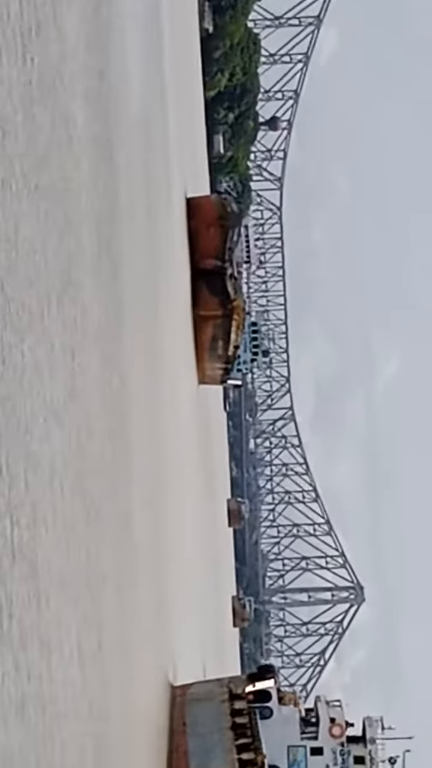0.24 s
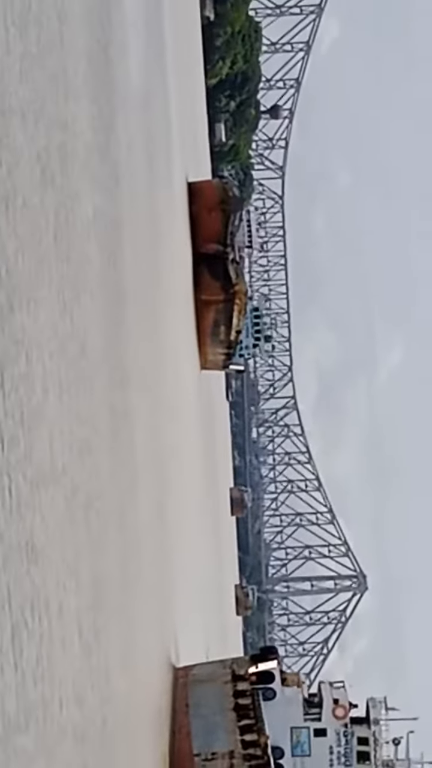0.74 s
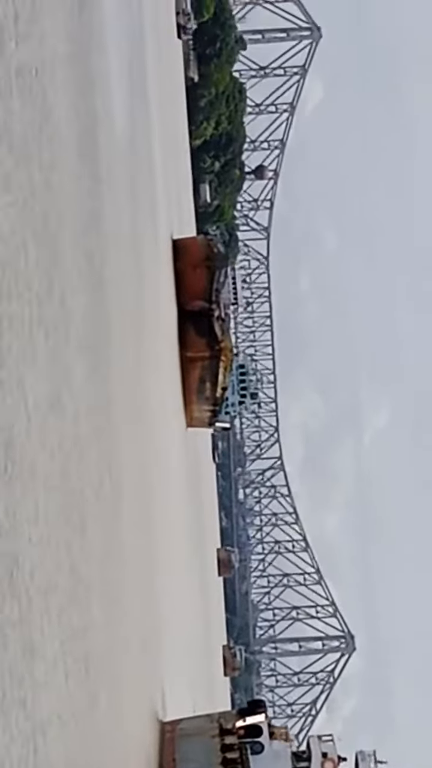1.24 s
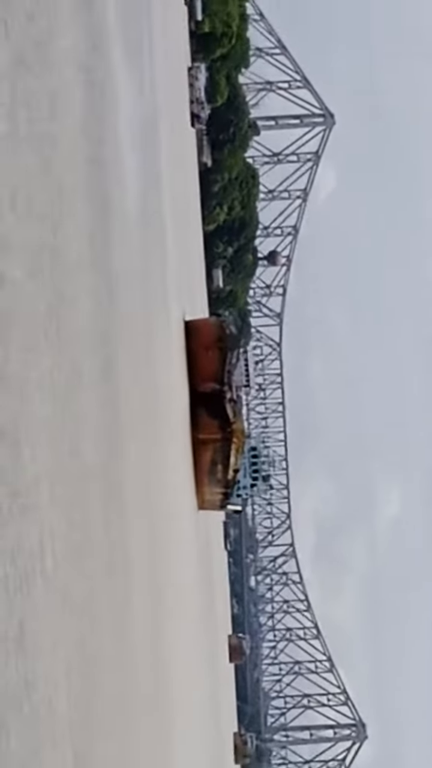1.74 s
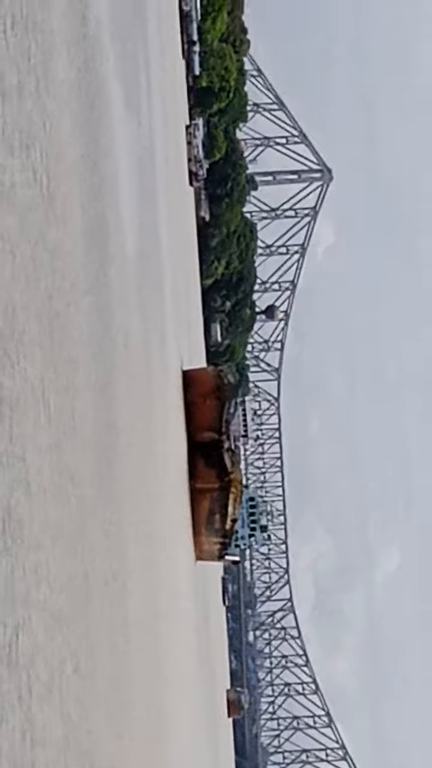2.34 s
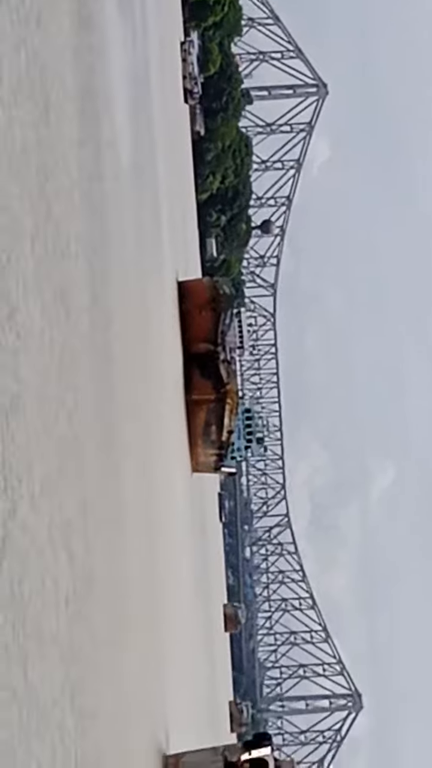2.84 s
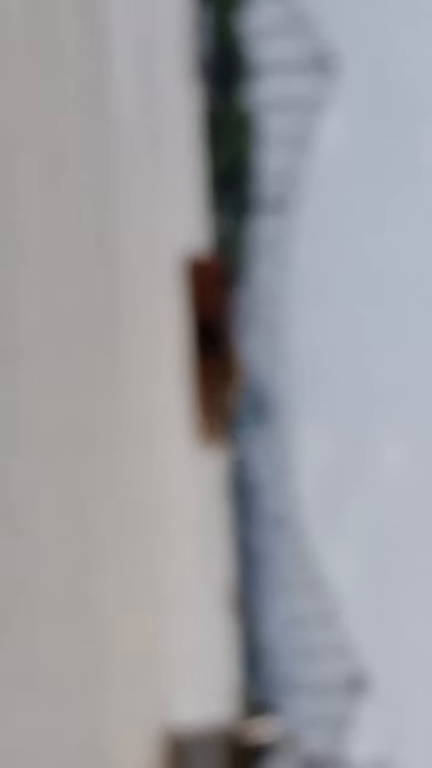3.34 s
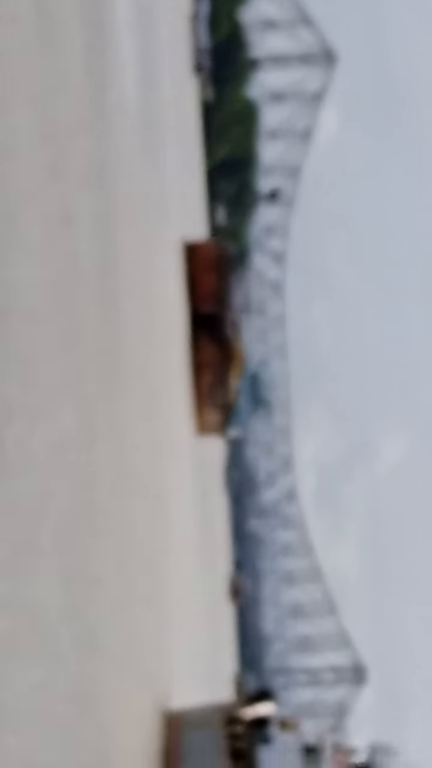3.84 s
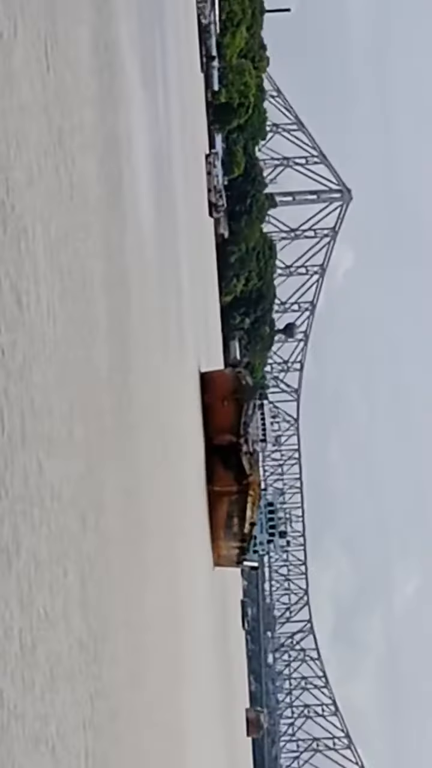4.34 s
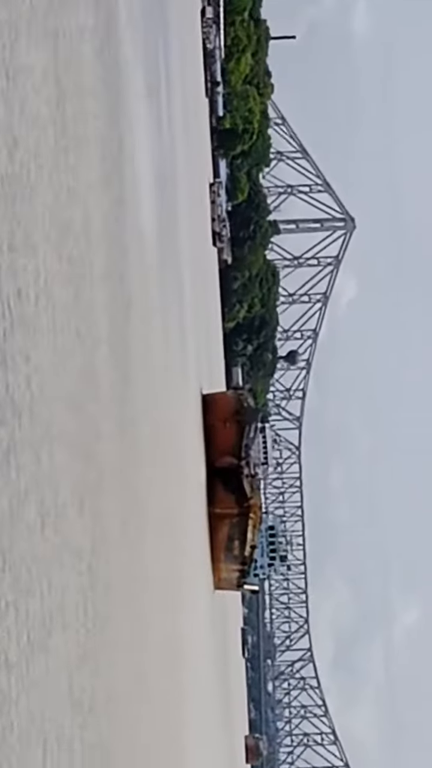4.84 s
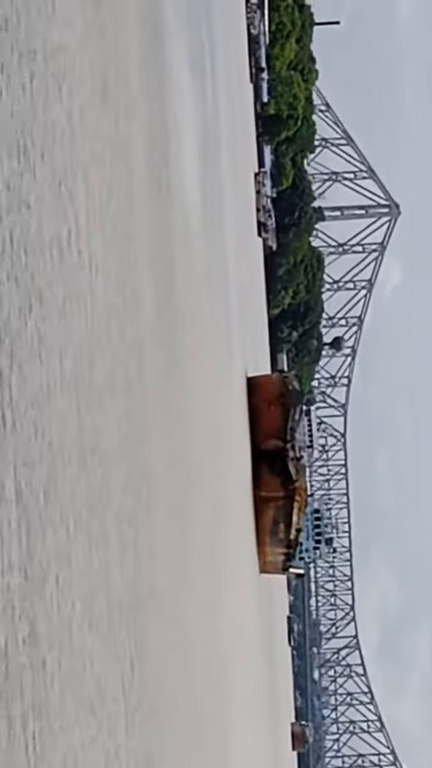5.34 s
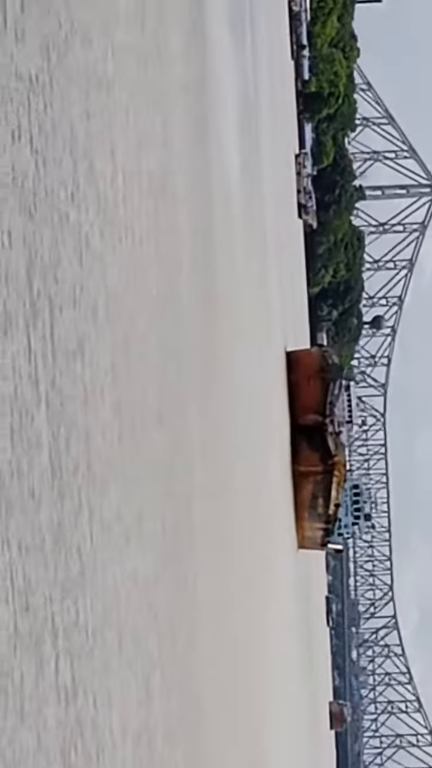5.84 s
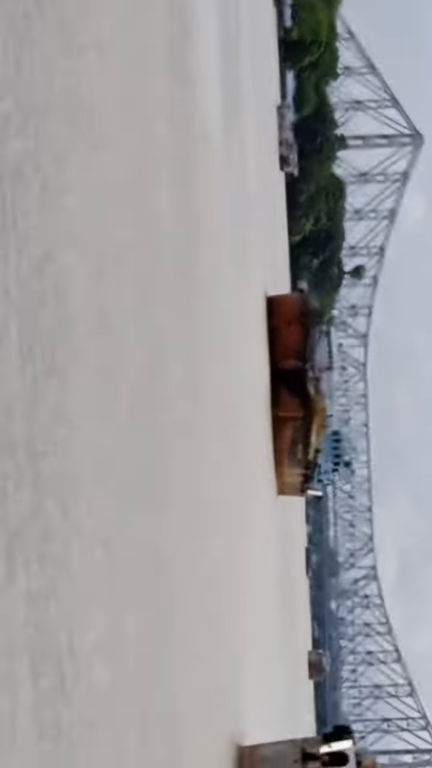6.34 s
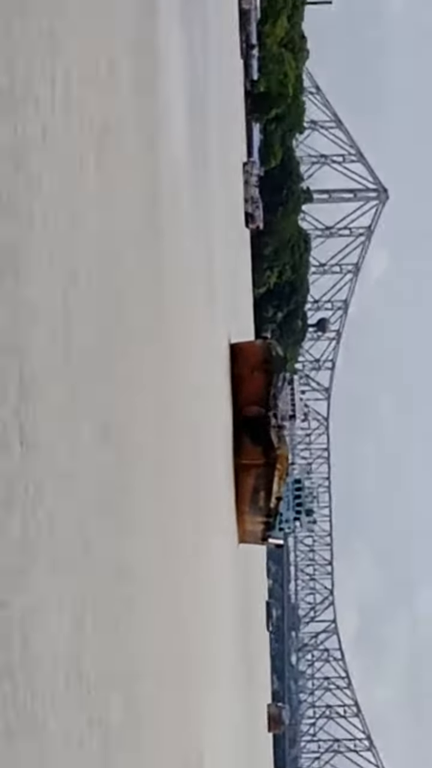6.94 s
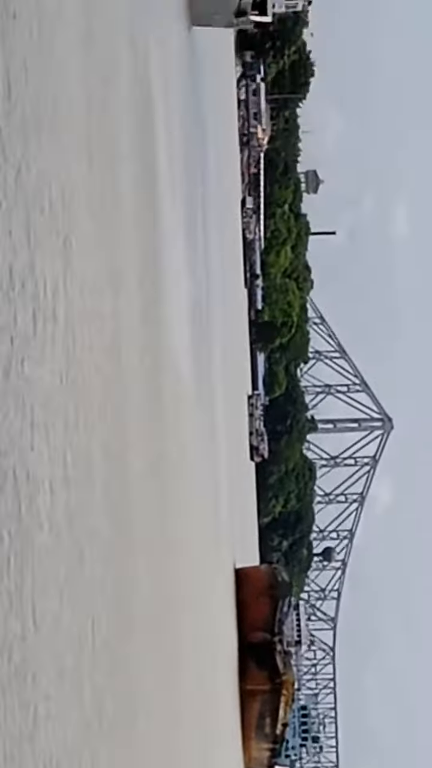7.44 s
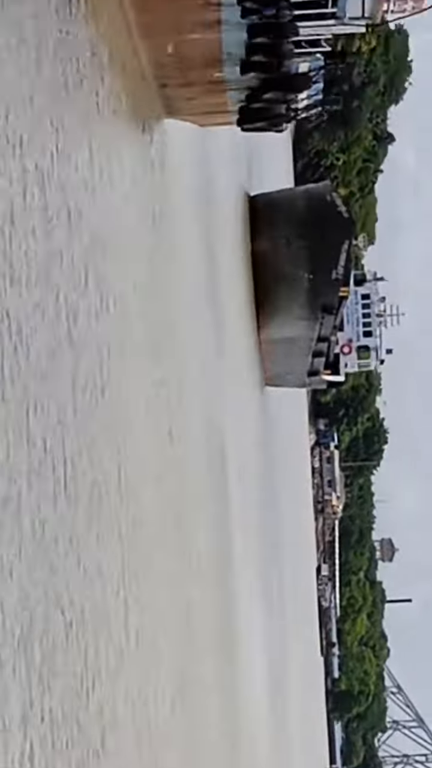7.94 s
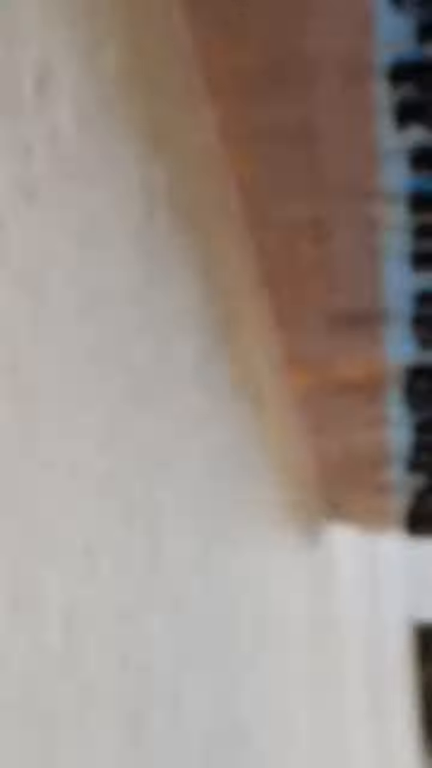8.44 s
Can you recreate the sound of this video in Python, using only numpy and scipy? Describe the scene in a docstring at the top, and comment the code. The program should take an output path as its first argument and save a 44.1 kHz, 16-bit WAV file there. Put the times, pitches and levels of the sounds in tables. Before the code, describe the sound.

A diesel engine runs from start to finish, about eight and a half seconds, heard from the deck of a river ferry. Its low, fast, even throb is the loudest sound and never changes speed. Mechanical knocks keep time with it, while loose metal fittings and a panel rattle and clink lightly in the same rhythm. Beneath this, the hull rumbles and water washes softly along the side. One short scuff sounds close by at about 0.7 seconds. Very faint squeaks come in the first second and again near 3 and 7 seconds. Slightly harder engine knocks fall around 0.3, 1.2, 4 and 7 seconds. At about 5 seconds the rattling becomes a little brighter and louder and the water hiss shifts in tone, while the throb carries on unchanged.

```python
"""A diesel's even throb on a river ferry's deck, with knocks and rattles in step with it.
Six cylinders fire unequally at about 740 rpm and boom in the exhaust; knocks ring the block and covers.
The engine shakes loose fittings and a panel. Water washes along the rumbling hull, something squeaks
faintly, and there is one short scuff close by. Around 5 s the treble changes colour."""
import sys
import numpy as np
from scipy import signal
from scipy.fft import rfft, irfft, next_fast_len
from scipy.io import wavfile
from scipy.ndimage import uniform_filter1d

SR = 44100
rng = np.random.default_rng(int(sys.argv[2]) if len(sys.argv) > 2 else 0)


def generate_wav(sig):
    """Save sig (samples, or channels by samples) to the path in sys.argv[1] as 16-bit PCM at SR."""
    pcm = np.round(np.clip(np.atleast_2d(sig).T, -1, 1) * 32767).astype(np.int16)
    wavfile.write(sys.argv[1], SR, pcm)


N = 383229
TIME = np.arange(N) / SR
CYCLE_HZ = 6.18349   # four-stroke cycle: two revolutions
# shakes of the loose metal (phase [cycles], early level [dB], late level [dB], decay [s])
SHAKES = [(0.1, -12.5, -15, 0.01), (0.25, -0.9, -1.5, 0.01), (0.314, -7, -7.5, 0.0074),
          (0.441, -10, -10, 0.023), (0.614, -18, -13.5, 0.017), (.765, -8, -0.9, 0.0081),
          (0.923, -4.5, -4.5, 0.013)]


def from_db(db):
    return 10 ** (np.asarray(db) / 20)


def unit_rms(x):
    return x / np.sqrt(np.mean(x ** 2) + 1e-20)


def noise():
    return rng.standard_normal(N)


def low_pass(x, hz):
    return signal.sosfilt(signal.butter(4, hz, fs=SR, output="sos"), x)


def coloured(x, spectrum):
    """Shape x by a smooth spectrum; rms 1."""
    hz, db = np.transpose(spectrum)
    size = next_fast_len(N)
    bins_hz = np.maximum(np.fft.rfftfreq(size, 1 / SR), 1)
    bass_cut = np.minimum(bins_hz / hz[0], 1) ** 2
    gain = from_db(np.interp(np.log(bins_hz), np.log(hz), db)) * bass_cut
    return unit_rms(irfft(rfft(x, size) * gain, size)[:N])


def resonate(x, hz, width_hz):
    """One resonance, peak gain 1."""
    radius = np.exp(-np.pi * width_hz / SR)
    feedback = [1, -2 * radius * np.cos(2 * np.pi * hz / SR), radius ** 2]
    return signal.lfilter(np.array([1, 0, -1]) * (1 - radius ** 2) / 2, feedback, x + 1e-18)


def body(x, modes, top_hz):
    """Parallel modes of alternating sign, low-passed; rms 1."""
    ring = sum((-1) ** k * from_db(db) * resonate(x, hz, width_hz)
               for k, (hz, width_hz, db) in enumerate(modes))
    return unit_rms(low_pass(ring, top_hz))


def cycle_clicks(phase, spread_db, jitter_s, lead=0):
    """One slightly uneven click per engine cycle, starting lead samples early."""
    cycles = np.arange(-int(lead / SR * CYCLE_HZ), int(N / SR * CYCLE_HZ) + 1)
    timing, strength = rng.standard_normal((len(cycles), 2)).T
    at = lead + np.round(((cycles + phase) / CYCLE_HZ + jitter_s * timing) * SR).astype(int)
    inside = (at >= 0) & (at < lead + N)
    clicks = np.zeros(lead + N)
    clicks[at[inside]] = from_db(spread_db * strength[inside])
    return clicks


def burst_power(clicks, decay_s):
    """Power envelope: one decaying burst per click."""
    return signal.lfilter([1], [1, -np.exp(-2 / (decay_s * SR))], clicks ** 2 + 1e-18)


def blow_envelope(start_s, decay_s):
    return (TIME >= start_s) * np.exp(-np.maximum(TIME - start_s, 0) / decay_s)


def blend(early, late, time_s=TIME):
    """Mostly early up to 4.8 s, mostly late from 5.42 s: the treble changes colour."""
    late_share = np.interp(time_s, [4.8, 5.42], [0.081, 0.77])
    return early + late_share * (late - early)


def shake_hits(early_hz, late_hz, spread_oct, level_db, spread_db, decay_s):
    """One hit per shake, louder for a harder one: (time [s], pitch [Hz], level [dB], decay [s])."""
    hits = []
    for cycle in range(int(N / SR * CYCLE_HZ) + 1):
        for phase, early_db, late_db, _ in SHAKES:
            time_s = (cycle + phase) / CYCLE_HZ
            detune, strength = np.clip(rng.standard_normal(2), -2, 2)
            hz = blend(early_hz, late_hz, time_s) * 2 ** (spread_oct * detune)
            db = level_db + blend(early_db, late_db, time_s) + spread_db * strength
            hits.append((time_s, hz, db, decay_s))
    return hits


def noisy_rings(hits, width_hz, rise_s):
    """One short ring of narrow-band noise per hit."""
    out = np.zeros(N + SR)
    age_s = np.arange(SR // 6) / SR
    for time_s, hz, db, decay_s in hits:
        band = resonate(rng.standard_normal(len(age_s)), hz, width_hz)
        ring = unit_rms(resonate(band, hz, width_hz))
        envelope = (1 - np.exp(-age_s / rise_s)) * np.exp(-age_s / decay_s)
        start = min(int(time_s * SR), N)
        out[start:start + len(age_s)] += from_db(db) * ring * envelope
    return out[:N]


def exhaust(level_db):
    """Six unequal puffs a cycle ring the pipe; their rings add and cancel into the throb."""
    # cylinder firings (phase [cycles], level [dB])
    firings = [(.090, -3.5), (.253, -3.5), (.421, -3), (0.591, -7.5), (.754, -2.12), (.915, -2.5)]
    # exhaust and cabin modes (frequency [Hz], width [Hz], gain [dB], polarity [+/-1])
    modes = [(100.6, 10.7, -2.5, -1), (115.35, 5.97, 3, -1), (128.1, 19.72, -2.5, 1),
             (165.75, 1.8, -11.5, 1), (238.6, 4.5, -28.5, -1), (252.4, 36, -37.5, 1),
             (311.4, 13, -29.5, -1)]
    run_in = SR // 2   # already running at the start
    clicks = sum(from_db(db) * cycle_clicks(phase, spread_db=0.57, jitter_s=0.00017, lead=run_in)
                 for phase, db in firings)
    puffs = low_pass(clicks, hz=665)   # valves open gradually
    boom = sum(sign * from_db(db) * resonate(puffs, hz, width_hz) for hz, width_hz, db, sign in modes)
    bass_cut = signal.butter(2, 56, "high", fs=SR, output="sos")   # an open pipe radiates little bass
    return from_db(level_db) * unit_rms(signal.sosfilt(bass_cut, boom)[run_in:])


def knocking(block_db, covers_db, steady_db, blow_db):
    """Combustion blows and noise ring the block; the noise bursts also ring its thin covers."""
    # combustion knocks (phase [cycles], level [dB], decay [s])
    knocks = [(.03, -2.5, 0.017), (0.212, 4.5, 0.0041), (0.284, -8, 0.01), (0.424, -2, 0.0065),
              (.6, -5.5, 0.0065), (0.755, -0.5, 0.014), (.84, -3.5, 0.011), (.925, -1, 0.013)]
    # harder knocks of the casing (time [s], relative level [dB], decay [s])
    clunks = [(0.289, 4, 0.057), (1.16, 6, 0.049), (4.028, 8, 0.041), (6.944, 4.5, 0.019)]
    # block modes (frequency [Hz], width [Hz], gain [dB])
    block_modes = [(310.7, 12.9, 4), (389, 12, -5.5), (478, 18, -8.5), (598, 18, -16.5), (684.8, 26.8, 5.5),
                   (716.8, 48.7, 2.5), (830, 69, 1), (830, 5.5, -16)]
    # cover modes (frequency [Hz], width [Hz], gain [dB])
    cover_modes = [(1319, 19, 4), (1530, 160, -13), (1704, 13, 0.5), (1990, 35, -4.5), (2168, 35, -2),
                   (2382, 19, -3), (2595, 70, -10.5)]
    blows, knock_power = np.zeros((2, N))
    for phase, db, decay_s in knocks:
        clicks = from_db(db) * cycle_clicks(phase, spread_db=1.5, jitter_s=0.001)
        blows += from_db(blow_db) * clicks
        knock_power += burst_power(clicks, decay_s)
    clunk_power = sum((from_db(db) * blow_envelope(time_s, decay_s)) ** 2
                      for time_s, db, decay_s in clunks)
    roughness = noise() * np.sqrt(knock_power + clunk_power + from_db(steady_db) ** 2)
    block = body(blows + roughness, block_modes, top_hz=920)
    covers = body(noise() * np.sqrt(knock_power), cover_modes, top_hz=3070)
    return from_db(block_db) * block + from_db(covers_db) * covers


def rattling(hiss_db, ring_db, grain_db):
    """Loose fittings chatter in grainy bursts at each shake, a little louder late on."""
    # hardest shakes (time [s], relative level [dB])
    jolts = [(0.201, 1), (1.6586, 1), (2.142, -0.5), (7.4803, 0), (7.6425, -1.5)]
    # early chatter spectrum (frequency [Hz], density [dB])
    early_spectrum = [(700, -6), (1100, -1.5), (1800, -0.5), (2600, 3), (3500, -3.5), (4600, -7.5),
                      (5600, -3.5), (7200, -2.5), (8200, -14), (10000, -23), (13500, -27.5), (15300, -14)]
    # late chatter spectrum (frequency [Hz], density [dB])
    late_spectrum = [(700, -4.5), (1100, -17.5), (1800, -4), (2400, 6), (3300, 14), (4400, -11),
                     (5300, -10.5), (6300, -4.5), (7200, -8.5), (8000, -14.5), (10000, -22), (13500, -26.5),
                     (15300, -22.5)]
    # fitting modes (frequency [Hz], width [Hz], gain [dB])
    modes = [(2280, 43, -5), (2244, 65, 3.5), (2700, 17, -7.5), (3430, 18, -6), (4480, 29, -7.5),
             (5030, 47, -9.5), (5650, 71, 2), (5970, 69, -1.5), (6260, 130, 4), (6800, 130, -4),
             (6750, 40, -5)]
    power = sum((from_db(db) * blow_envelope(time_s, decay_s=0.021)) ** 2 for time_s, db in jolts)
    for phase, early_db, late_db, decay_s in SHAKES:
        clicks = cycle_clicks(phase, spread_db=2.2, jitter_s=0.0039)
        power += burst_power(from_db(blend(early_db, late_db)) * clicks, decay_s)
    envelope = np.sqrt(np.abs(uniform_filter1d(power, size=280)))
    grains = from_db(grain_db * unit_rms(uniform_filter1d(noise(), size=110)))
    chatter = noise() * grains * envelope
    hiss = blend(coloured(chatter, early_spectrum), coloured(chatter, late_spectrum))
    ring = body(chatter, modes, top_hz=6600)
    lift_db = blend(0, 4)
    return from_db(hiss_db + lift_db) * hiss + from_db(ring_db + lift_db) * ring


def deck_echoes(x, echo_db, decay_s, count):
    """Early echoes off steel deck, rails and roof comb the sound at about equal power."""
    lags_s = rng.uniform(0.001, 0.023, count)
    signs = rng.choice([-1, 1], count)
    gains = from_db(echo_db) * unit_rms(np.exp(-lags_s / decay_s)) * signs / np.sqrt(count)
    echoes = sum(gain * np.pad(x, (int(lag_s * SR), 0))[:N] for lag_s, gain in zip(lags_s, gains))
    return (x + echoes) / np.sqrt(1 + from_db(echo_db) ** 2)


def clinks(decay_s):
    """Small loose metal pieces ring as the engine shakes them."""
    # clearest clinks (time [s], pitch [Hz], level [dB])
    accents = [(3.437, 5600, -49.5), (3.598, 5540, -49), (3.76, 5570, -56), (7.725, 6120, -52),
               (7.808, 6690, -47)]
    hits = [(time_s, hz, db, decay_s) for time_s, hz, db in accents]
    hits += shake_hits(early_hz=5630, late_hz=6470, spread_oct=0.13,
                       level_db=-59, spread_db=1, decay_s=decay_s)
    return noisy_rings(hits, width_hz=100, rise_s=0.0012)


def panel_clatter():
    """A loose panel answers the same shakes, lower and duller."""
    # loudest clatters (time [s], pitch [Hz], level [dB], decay [s])
    accents = [(1.9, 2100, -49, 0.037), (2.065, 2030, -44.5, 0.015), (3.07, 1400, -50, 0.06),
               (4.57, 1780, -45.5, 0.021), (5.08, 2950, -51, 0.027), (6.593, 1320, -47.5, 0.06),
               (7.66, 3500, -53.5, 0.03), (7.9, 1350, -50, 0.053), (8.07, 1710, -50.5, 0.057)]
    hits = shake_hits(early_hz=1540, late_hz=1700, spread_oct=0.34,
                      level_db=-53, spread_db=2.5, decay_s=0.025)
    return noisy_rings(accents + hits, width_hz=420, rise_s=0.00084)


def wash(level_db, swell_db, swells_per_s):
    """Water hisses along the hull with a slight random swell."""
    # early water spectrum (frequency [Hz], density [dB])
    early_spectrum = [(800, -1.5), (1130, -6.5), (1460, -8), (1800, -6), (2300, -14.5), (2800, -17),
                      (3800, -26), (4600, -26), (5700, -23), (7100, -25), (8300, -40), (13500, -37.5),
                      (15200, -33)]
    # late water spectrum (frequency [Hz], density [dB])
    late_spectrum = [(800, -0.5), (1130, -7), (1460, -3), (1880, -14), (2360, -5), (2690, -18),
                     (3100, -3.5), (3500, -18), (4300, -21.5), (6250, -22), (7200, -25.5), (8000, -34),
                     (9800, -38), (13500, -51), (15200, -40)]
    water = noise()
    swell = np.interp(TIME * swells_per_s, np.arange(64), rng.standard_normal(64))
    hiss = blend(coloured(water, early_spectrum), coloured(water, late_spectrum))
    return from_db(level_db + swell_db * swell) * hiss


def hull(rumble_db):
    """Another engine hums faintly, out of step with this one, over a low rumble."""
    # hum partials (frequency [Hz], rms level [dB])
    partials = [(12.3, -60.5), (24.5, -68), (37.1, -64.5), (48.6, -64.5)]
    # rumble spectrum (frequency [Hz], density [dB])
    spectrum = [(10, 1), (25, -5), (45, -5.5), (65, -2), (90, 3), (125, 3), (170, -2), (215, -5),
                (270, -6.5), (400, -9.5), (550, -18), (850, -14.5), (1200, -28.5), (4000, -81.5)]
    hum = sum(from_db(db) * np.sqrt(2) * np.sin(2 * np.pi * (hz * TIME + rng.random()))
              for hz, db in partials)
    return hum + from_db(rumble_db) * coloured(noise(), spectrum)


def squeaks():
    """Faint gliding tones that swell and fade."""
    # squeaks (time [s], length [s], start pitch [Hz], end pitch [Hz], level [dB])
    glides = [(0, 0.17, 605, 548, -46), (0.269, 0.17, 1590, 1450, -53), (0.857, 0.13, 1470, 1570, -50),
              (3.064, 0.095, 570, 594, -46.5), (6.93, 0.11, 637, 583, -45)]
    out = np.zeros(N)
    for time_s, length_s, start_hz, end_hz, db in glides:
        progress = np.clip((TIME - time_s) / length_s, 0, 1)
        hz = start_hz + progress * (end_hz - start_hz)
        out += from_db(db) * np.sin(np.pi * progress) * np.sin(2 * np.pi * np.cumsum(hz) / SR)
    return out


def scuff():
    """A quick run of rubbing contacts, bright then dull."""
    # contacts (time [s], level [dB], decay [s], cutoff [Hz])
    contacts = [(.721, -43, 0.0042, 14000), (0.7283, -31.5, 0.004, 15000), (0.723, -32, 0.0052, 7550),
                (0.736, -33.5, 0.013, 6800), (0.76, -36, 0.002, 7000), (0.763, -29.5, 0.017, 2470)]
    # friction spectrum (frequency [Hz], density [dB])
    spectrum = [(500, -8), (1200, -5), (2000, -5), (3000, -8.5), (4500, -21), (6800, -3.5), (9000, -19),
                (12500, -18), (15500, -3.5)]
    friction = coloured(noise(), spectrum)
    return sum(from_db(db) * low_pass(friction * blow_envelope(time_s, decay_s), top_hz)
               for time_s, db, decay_s, top_hz in contacts)


def scene():
    """Engine, loose metal, water and hull, heard from the deck; mono."""
    engine = exhaust(level_db=-26.5) + knocking(block_db=-46, covers_db=-59.5, steady_db=-10, blow_db=18.5)
    rattle = rattling(hiss_db=-64, ring_db=-68.5, grain_db=5.5)
    fittings = deck_echoes(rattle, echo_db=-2.5, decay_s=0.019, count=12)
    metal = fittings + clinks(decay_s=0.013) + panel_clatter()
    water = wash(level_db=-56.5, swell_db=1.8, swells_per_s=0.86)
    return (engine + metal + water + hull(rumble_db=-43.5) + squeaks() + scuff())[None]


def record(dry):
    """Steep low-pass at 15.85 kHz."""
    return signal.sosfilt(signal.ellip(10, 0.1, 80, 15850, fs=SR, output="sos"), dry)


dry = scene()
out = record(dry)
generate_wav(out)
```